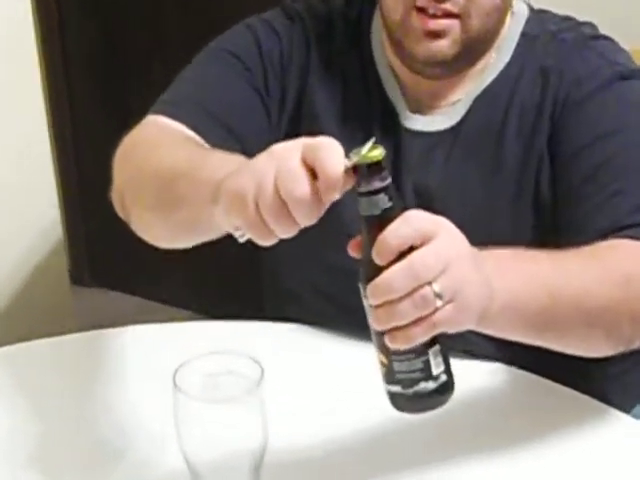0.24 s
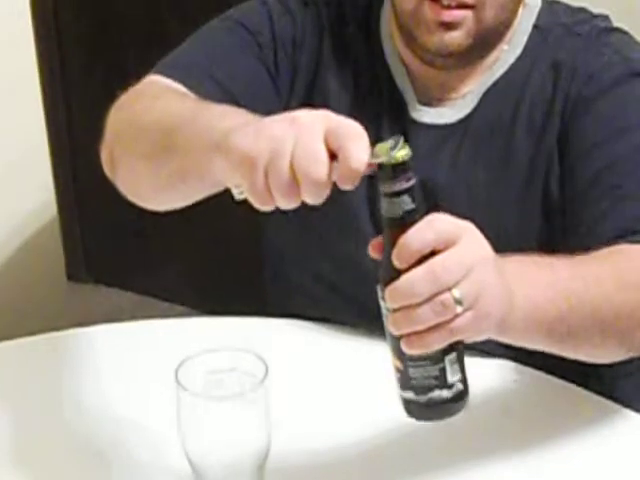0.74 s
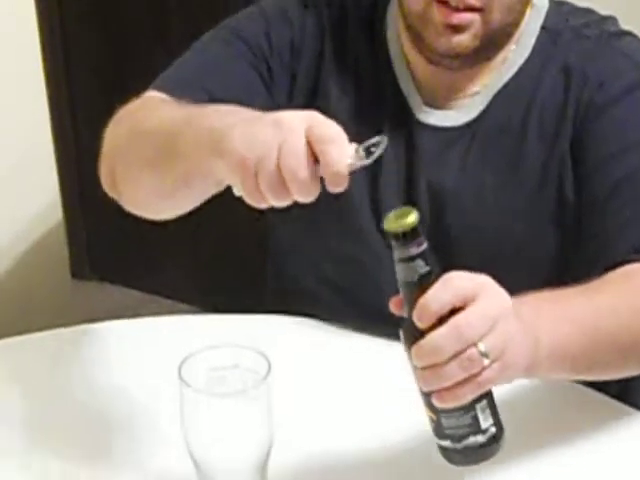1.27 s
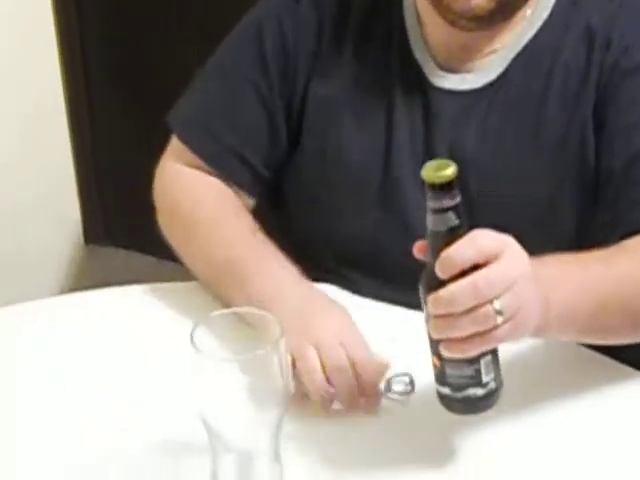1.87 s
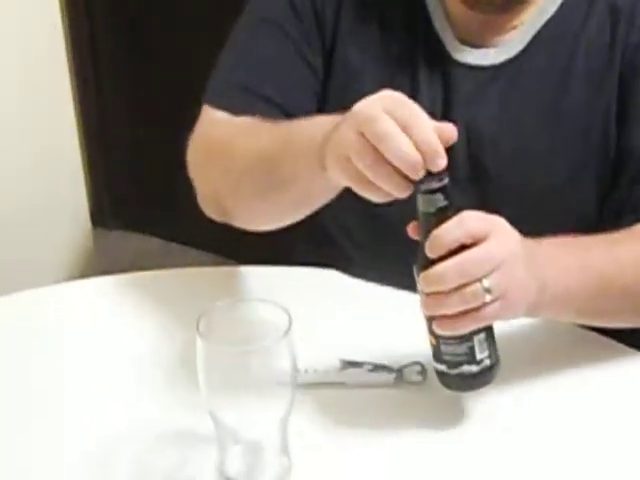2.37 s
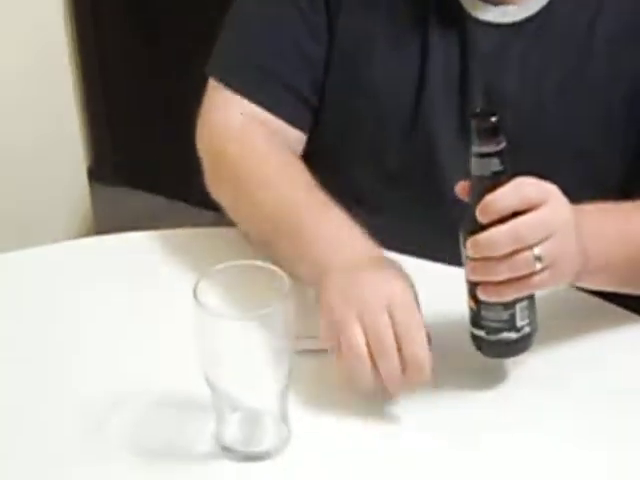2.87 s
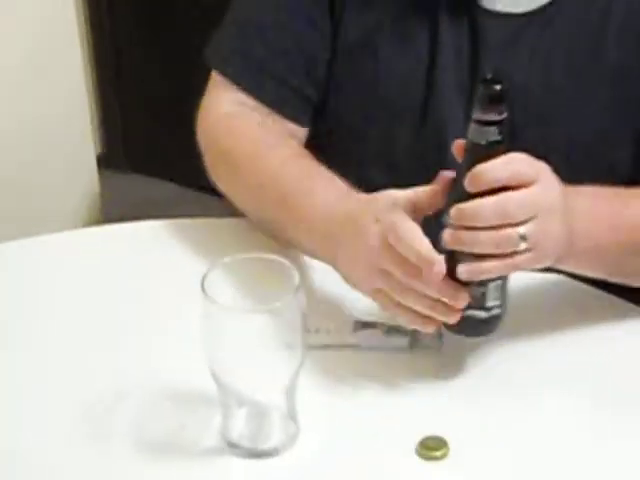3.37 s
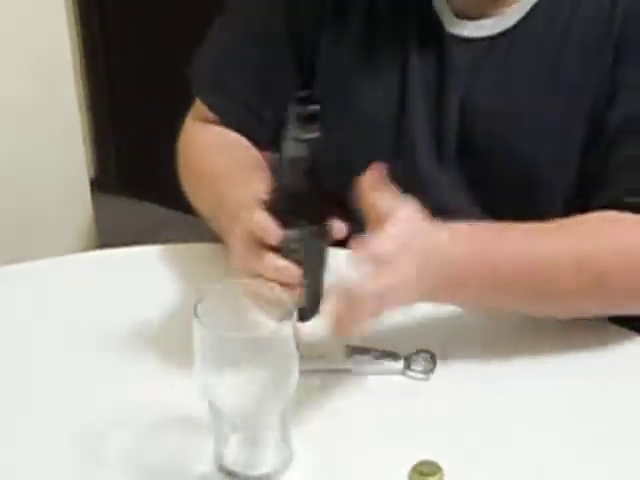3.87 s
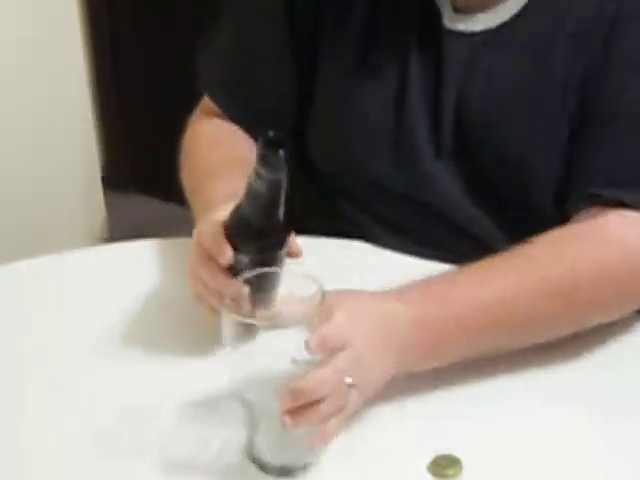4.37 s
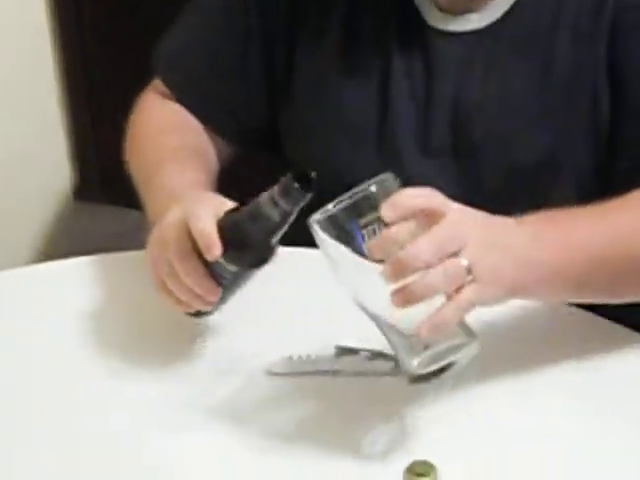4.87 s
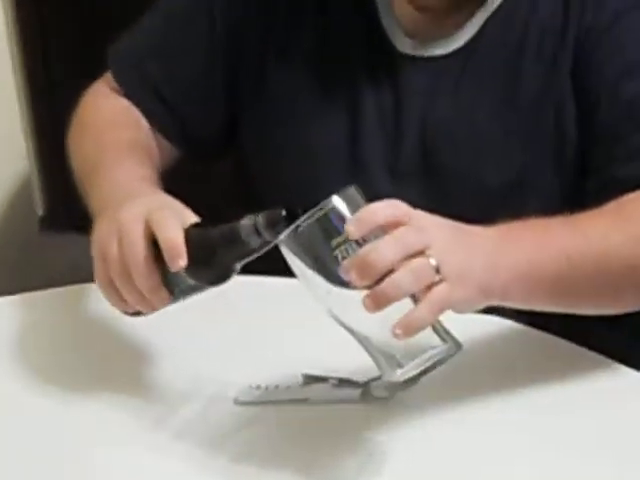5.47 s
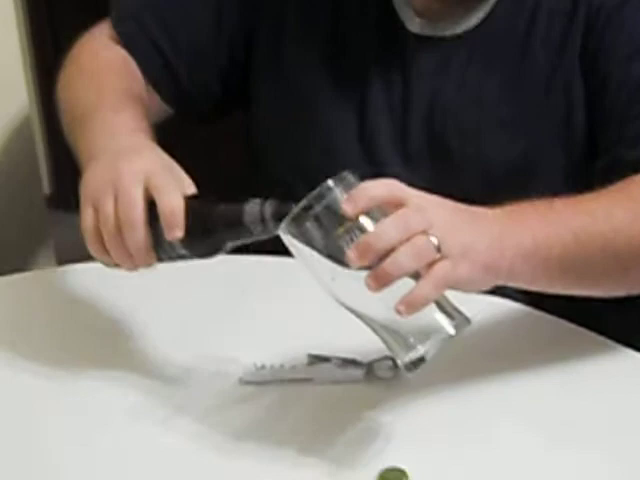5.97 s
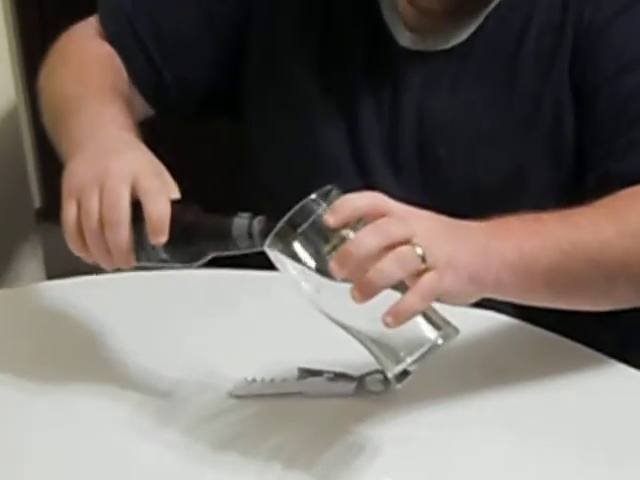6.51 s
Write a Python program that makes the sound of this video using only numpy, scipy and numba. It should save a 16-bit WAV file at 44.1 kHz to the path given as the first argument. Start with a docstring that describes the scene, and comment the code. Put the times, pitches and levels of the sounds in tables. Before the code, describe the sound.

In a small, slightly echoing room with an appliance humming, a beer bottle is opened close to the microphone: a thin hiss, a stronger spurt, then snapping metal and a pop from the neck. A metal opener is put down with a loud clatter and the loose cap lands ringing on the table. A glass judders quietly across the tabletop and is lightly knocked before a very soft, bubbling pour starts.

```python
"""Opening and pouring a beer.

Gas hisses under a crown cap, the cap twangs loose and the bottle neck pops and hoots. The opener is
laid on the table; the cap drops and bounces. A glass is dragged, tilted and knocked, and beer bubbles
down its wall. The small room echoes and an appliance hums. Gain control ducks at loud blows, holds,
then lets the room noise swell back."""
import sys
import numpy as np
from scipy import signal
from scipy.fft import rfft, irfft
from scipy.io import wavfile
from scipy.ndimage import minimum_filter1d
from numba import njit

SR = 44100
rng = np.random.default_rng(int(sys.argv[2]) if len(sys.argv) > 2 else 0)


def to_wav(sig):
    """Store sig (one row per channel, or 1-D mono) as 16-bit WAV at the path in sys.argv[1].

    Samples outside -1..1 are clipped; the rate is SR.
    """
    pcm = np.clip(np.atleast_2d(sig), -1, 1) * 32767
    pcm = np.round(pcm).astype(np.int16)
    wavfile.write(sys.argv[1], SR, pcm.T)  # frames by channels


N = 297366

# Gas spurts under the cap (start [s], widest [s], end [s], level [dB], closing time [s])
GAS_SPURTS = [(.008, .26, .35, -17, .25), (.044, 0.048, 0.054, -18, .12), (.409, .44, 0.47, -8.5, .07)]
# Gas jet spectrum (frequency [Hz], relative density [dB])
JET_SPECTRUM = [(300, -37.5), (1000, -19.5), (1700, -15.5), (2700, -19.5), (4500, -9.5), (7000, -5),
                (10000, 0.5), (12500, -1.5)]
# Resonances of the gap under the cap (frequency [Hz], width [Hz], lift [dB])
GAP_RESONANCES = [(5000, 400, 3), (5900, 350, 2.7), (6500, 280, 5.4), (7360, 370, 9.6), (8200, 350, 5),
                  (9000, 430, 3.7)]
# Neck air tones (start [s], widest [s], end [s], level [dB], first pitch [Hz], last pitch [Hz])
NECK_HOOTS = [(0.727, 0.735, .748, -7.5, 741, 898), (0.781, 0.774, .81, -18, 1010, 858),
              (0.998, 1.006, 1.025, -30, 876, 785)]
# Cap giving way in jerks
# (time [s], cap peak [dB], neck peak [dB], contact cutoff [Hz], cap ring/crack [dB], rattle gap [s])
CAP_PRY_JERKS = [(.0495, -25, -39.5, 9000, -19, .002), (0.7235, -19, -6.5, 7000, -13.5, .0036),
                 (.733, 5.5, 1, 6500, -23, .0013), (.778, -3.5, -16, 12000, -8, .0015),
                 (.7925, -1, -20, 3200, 26, .003), (.8012, 1.5, -2.5, 12000, 4, .003),
                 (.996, -18.5, -20.5, 8000, 6, .023), (2.3135, -32, -25, 4000, 6, .002)]
# First gush of beer, then a thin stream (start [s], widest [s], end [s], level [dB], closing time [s])
BEER_FLOWS = [(5.874, 5.905, 5.914, -36.5, 0.036), (5.85, 5.9, 6.74, -60, .3)]

# Blows (time [s], peak [dB], contact cutoff [Hz], ring/crack [dB], rattle gap [s])
OPENER_HITS = [(1.2445, -13.5, 3000, -5.5, .006), (1.3465, -25.5, 9000, -3, 0.0021),
               (1.398, -24, 5970, -5, .012), (1.5765, -22, 9740, -9.5, .003),
               (1.6365, -2.5, 5000, -7.5, 0.0097), (1.708, -8, 5000, -8, 0.0031),
               (1.7172, 4, 10000, 2, 0.0042), (1.847, 16.5, 8670, -13, .006),
               (1.8765, 4, 7000, -25, 0.0019), (2.0745, -22.5, 2000, -20, 0.0019)]  # lifted off, shifted in the hand, laid down
CAP_LANDINGS = [(3.0855, 15.7, 4930, 16, .0101), (3.137, 4.6, 11260, 6.1, .0158)]  # cap lands, hops, lands again
GLASS_JUDDERS = [(4.2312, -14, 1400, -4, 0.0092), (4.293, -24, 1700, -11, 0.0081),
                 (4.3085, -22.5, 557, 8, .009), (4.389, -27, 2820, -26, .005)]  # glass slipping over the table
GLASS_HITS = [(5.256, -8, 8500, 4.4, .007), (5.294, -20, 5000, 6, .005), (5.344, -25, 4470, 6, .004)]  # tilted glass chattering
BEER_SLAPS = [(5.832, -21.5, 3000, -6, .014), (5.9098, -16, 4050, -6.5, .003),
              (6.405, -29.5, 1500, -6, .008), (6.516, -29.5, 2000, -9, 0.0072)]  # beer hitting the glass wall

# Modes (frequency [Hz], relative level [dB], T60 [s])
NECK_MODES = [(2470, -10, .03), (3040, -6, .045), (3170, -2, .02), (3300, 0, .018), (3440, -2, .02),
              (3620, -5, .02)]  # bottle neck
HELD_CAP_MODES = [(3150, -16.5, 0.18), (5105, -1.5, 0.085), (5000, -11, .06), (8000, -9, 0.037),
                  (8100, -8, 0.06), (8340, 0.5, 0.071), (8930, -1, 0.097), (9200, -2.5, .04)]  # cap on the bottle
FREE_CAP_MODES = [(3660, -32.5, .07), (4020, -25.5, 0.1), (4564, -16, 0.12), (4600, -30, 0.11),
                  (4963, -2.5, 0.081), (8140, -14, 0.061), (8650, -2.5, 0.032), (8780, -13, 0.086),
                  (10300, -21, 0.091), (12030, -19, 0.069)]  # loose cap
OPENER_MODES = [(1420, -28.5, .02), (3174, -0.5, 0.0085), (4340, 2.5, 0.007), (5060, 1, 0.011),
                (7040, -4.5, 0.011), (9000, -7.5, .012), (9420, -4, 0.013)]  # bottle opener
TABLE_MODES = [(236, -13.5, .06), (392, -1.5, 0.048), (643, -2.5, 0.067), (900, -2, 0.029),
               (1500, -15, 0.051)]  # table top
GLASS_MODES = [(554, -6, 0.1), (1255, -5.5, 0.09), (1350, -1, 0.14), (1473, 0, 0.051), (1790, -5.5, 0.066),
               (2110, -19, 0.069), (2660, -7, 0.059), (2954, -3.5, 0.093), (3280, 5, 0.04),
               (3444, -2.5, 0.062), (4260, -3, 0.06), (4580, -5, .12), (5104, -4, 0.064), (6850, -6, 0.043),
               (7100, 6, 0.045), (8000, -12, 0.14), (9400, -8, .05)]  # hand-held glass
POCKET_MODES = [(950, -4.5, 0.016), (1145, 2, 0.029), (2680, 5, 0.0074)]  # air pocket in the beer

# Contact crack spectra (frequency [Hz], relative density [dB])
PRY_SPECTRUM = [(100, -33.5), (700, -10), (2000, -10), (3500, -3.5), (6300, 3), (9000, 9), (12000, -12.5)]  # metal cap being pried
OPENER_SPECTRUM = [(60, -35), (180, -10), (400, -3.5), (800, -7.5), (1500, 0), (2400, -7), (3300, -1.5),
                   (6000, 1.5), (12000, -0.5)]  # opener on the table
LANDING_SPECTRUM = [(150, -32), (700, -21), (1300, -4), (2200, -17), (3300, -1), (4500, 7), (6000, 3),
                    (12000, -14)]  # cap on the table
DULL_SPECTRUM = [(60, -18), (200, -3), (700, 0), (1500, -2.5), (2300, -12.5), (4000, -5.5), (11000, -5.5)]  # glass slips, beer slaps
KNOCK_SPECTRUM = [(100, -34), (550, 3), (900, -4.5), (1500, 3), (2400, -4), (3300, -4), (5000, -5),
                  (6000, -12), (7200, -15), (11000, -8)]  # knocked glass

# Room noise spectrum (frequency [Hz], relative density [dB])
ROOM_SPECTRUM = [(12, -4), (28, -2), (58, -6.5), (90, -12), (200, -10), (330, -6), (480, -10), (700, -14.5),
                 (1100, -14.5), (2000, -19.5), (4000, -21.5), (10000, -25), (11200, -28.5), (12500, -25.5)]
# Appliance hum tones (frequency [Hz], level [dB], width [Hz])
HUM_TONES = [(129.5, -56, 8), (236.1, -47.5, 2.7), (316.5, -54, 7.4), (360.7, -47, 2.8)]


def gas_hiss(sputter_db=0.87, sputter_hz=130):
    """Gas jets through the cap's crimp; foam in the gap makes it sputter."""
    sputter = flicker(sputter_db, sputter_hz)
    return spurts(GAS_SPURTS) * sputter * noise(JET_SPECTRUM, peaks=GAP_RESONANCES)


def neck_hoot(closing_s=.07, flutter_db=2, flutter_hz=120):
    """Neck air bounces on the gas below, as in a blown bottle; each hoot's pitch glides from its first to its
    last value."""
    out, t = 0, np.arange(N) / SR
    for start_s, widest_s, end_s, db, first_hz, last_hz in NECK_HOOTS:
        pitch_hz = np.interp(t, [start_s, end_s], [first_hz, last_hz])
        phase = 2 * np.pi * np.cumsum(pitch_hz) / SR
        out += spurts([(start_s, widest_s, end_s, db, closing_s)]) * np.sin(phase)
    return out * flicker(flutter_db, flutter_hz)


def neck_pops(contact_hz=5500, ring_db=7):
    """Each jerk of the cap pops the gas in the neck."""
    pops = [(time_s, db, contact_hz, ring_db, gap_s) for time_s, _, db, _, _, gap_s in CAP_PRY_JERKS]
    return blows(rattle(pops, count=3, loss_db=1.5), NECK_MODES, PRY_SPECTRUM, crack_t60_s=0.021)


def cap_twangs():
    """The bending cap rings at each jerk."""
    twangs = [(time_s, db, *contact) for time_s, db, _, *contact in CAP_PRY_JERKS]
    touches = rattle(twangs, count=3, loss_db=1.8)
    return blows(touches, HELD_CAP_MODES, PRY_SPECTRUM, crack_t60_s=0.056)


def opener_clatter():
    """The opener clicks in the hand and clatters onto the table."""
    touches = rattle(OPENER_HITS, count=3, loss_db=3.5, gap_ratio=1.15)
    return blows(touches, OPENER_MODES, OPENER_SPECTRUM, crack_t60_s=0.023)


def cap_drop():
    """The loose cap rings on the table, each landing a quickening rattle."""
    touches = rattle(CAP_LANDINGS, count=4, loss_db=1.3)
    return blows(touches, FREE_CAP_MODES, LANDING_SPECTRUM, crack_t60_s=0.059)


def glass_drag():
    """The sliding glass judders and shakes the table top."""
    touches = rattle(GLASS_JUDDERS, count=5, loss_db=0.5, gap_ratio=1.1)
    return blows(touches, TABLE_MODES, DULL_SPECTRUM, crack_t60_s=0.063)


def glass_knocks():
    """Knocks ring the glass itself, damped by the hand."""
    touches = rattle(GLASS_HITS, count=4, loss_db=0.25, gap_ratio=1.03)
    return blows(touches, GLASS_MODES, KNOCK_SPECTRUM, crack_t60_s=0.091)


def beer_bubbles(rate_per_s=1500, q=7, low_hz=700, high_hz=3800, spread_db=4, pitches=18):
    """Small bubbles ring at random as the stream runs down the wall."""
    strengths = from_db(spread_db * rng.standard_normal(N))
    kicks = strengths * (rng.random(N) < rate_per_s / SR)
    pitch_index = rng.integers(0, pitches, N)
    bubbles = sum(resonate(kicks * (pitch_index == k), hz, hz / q) * np.sqrt(hz)
                  for k, hz in enumerate(np.geomspace(low_hz, high_hz, pitches)))
    return spurts(BEER_FLOWS) * rms_one(bubbles)


def beer_slaps():
    """The first beer slaps the wall and rings an air pocket."""
    touches = rattle(BEER_SLAPS, count=2, loss_db=4)
    return blows(touches, POCKET_MODES, DULL_SPECTRUM, crack_t60_s=0.026)


def room(x, echo_db=-11, t60_s=0.26, first_echo_s=.005, wall_cutoff_hz=9000):
    """Direct sound plus dense, fast-dying wall echoes."""
    t = np.arange(SR // 2) / SR
    echoes = rng.standard_normal(len(t)) * decay(t, t60_s) * (t > first_echo_s)
    echoes = low_pass(echoes, wall_cutoff_hz, order=1)
    return x + from_db(echo_db) * signal.fftconvolve(x, echoes / np.linalg.norm(echoes))[:N]


def background(noise_db=-39, waver=0.63):
    """Steady room noise and an appliance's wavering hum."""
    out, t = from_db(noise_db) * noise(ROOM_SPECTRUM), np.arange(N) / SR
    for hz, db, width_hz in HUM_TONES:
        tone = np.sqrt(2) * np.sin(2 * np.pi * (hz * t + rng.random()))
        narrow_noise = rms_one(resonate(rng.standard_normal(N + SR), hz, width_hz)[SR:])
        out += from_db(db) * rms_one(tone + waver * narrow_noise)
    return out


def rattle(rows, count, loss_db, gap_ratio=.86):
    """Split each blow into touches: gaps scale geometrically, strength falls ever faster."""
    return [(time_s + gap_s * np.sum(gap_ratio ** np.arange(k)), db - loss_db * k ** 2, cutoff, ring_db)
            for time_s, db, cutoff, ring_db, gap_s in rows for k in range(count)]


def blows(touches, modes, crack_spectrum, crack_t60_s):
    """Each touch is a noise crack plus randomly weighted modes; soft contacts are duller."""
    size = SR // 3
    t, out = np.arange(size) / SR, np.zeros(N + size)
    hz, mode_db, t60_s = np.transpose(modes)
    rings = np.sin(2 * np.pi * hz[:, None] * t) * decay(t, t60_s[:, None])
    for time_s, peak_db, contact_hz, ring_db in touches:
        weights = from_db(mode_db + rng.uniform(-2.4, 2, len(hz))) * rng.choice([-1, 1], len(hz))
        ring = from_db(ring_db) * peak_one(weights @ rings)
        crack = peak_one(noise(crack_spectrum, size) * decay(t, crack_t60_s))
        start = round(time_s * SR)
        out[start:start + size] += from_db(peak_db) * peak_one(low_pass(crack + ring, contact_hz))
    return out[:N]


def spurts(rows, onset_s=.012, swell_db=9.5, sag_db=4, silent_db=-100):
    """Envelope of flows that set in, swell, sag and close."""
    gain, t = 0, np.arange(N) / SR
    for start_s, widest_s, end_s, db, closing_s in rows:
        times_s = [start_s - onset_s, start_s, widest_s, end_s, end_s + closing_s]
        levels_db = [silent_db, db - swell_db, db, db - sag_db, silent_db]
        gain += from_db(np.interp(t, times_s, levels_db))
    return gain


def flicker(depth_db, cutoff_hz):
    """Gain wandering randomly about 1."""
    return from_db(depth_db * rms_one(low_pass(rng.standard_normal(N), cutoff_hz)))


def noise(spectrum, size=N, peaks=()):
    """Unit-RMS shaped noise with bell-shaped resonances."""
    hz = np.maximum(np.fft.rfftfreq(size, 1 / SR), 1)
    points_hz, points_db = np.transpose(spectrum)
    db = np.interp(np.log(hz), np.log(points_hz), points_db)
    for centre_hz, width_hz, lift_db in peaks:
        db += lift_db / (1 + (2 * (hz - centre_hz) / width_hz) ** 2)
    return rms_one(irfft(rfft(rng.standard_normal(size)) * from_db(db), size))


def resonate(x, hz, width_hz):
    """Two-pole band-pass resonator."""
    radius = np.exp(-np.pi * width_hz / SR)
    feedback = [1, -2 * radius * np.cos(2 * np.pi * hz / SR), radius ** 2]
    return signal.lfilter([1, 0, -1], feedback, x + 1e-18)


def low_pass(x, hz, order=2):
    return signal.sosfilt(signal.butter(order, hz, fs=SR, output="sos"), x)


def decay(t, t60_s):
    return np.exp(-np.log(1000) * t / t60_s)


def from_db(db):
    return 10 ** (np.asarray(db) / 20)


def rms_one(x):
    return x / np.sqrt(np.mean(x ** 2) + 1e-20)


def peak_one(x):
    return x / np.max(np.abs(x))


@njit
def ride_gain(allowed, gain, attack_samples, hold_samples, release_samples):
    """Gain falls fast to the allowed value, holds, then creeps back to 1."""
    out, waited = np.empty(len(allowed)), 0
    for i in range(len(allowed)):
        waited += 1
        if allowed[i] < gain:
            gain *= (allowed[i] / gain) ** (1 / attack_samples)
            waited = 0
        elif waited > hold_samples:
            gain += (1 - gain) / release_samples
        out[i] = gain
    return out


def gain_control(x, ceiling_db=-2.0, start_db=-3, attack_s=0.0009, hold_s=0.71, release_s=0.78):
    """Peaks over the ceiling, seen about 3 ms ahead, turn everything down."""
    peaks = -minimum_filter1d(-np.abs(x), size=240)
    allowed = from_db(ceiling_db) / (peaks + 1e-9)
    return x * ride_gain(allowed, float(from_db(start_db)), attack_s * SR, hold_s * SR, release_s * SR)


def scene():
    """Bottle, glass and beer in the room; mono."""
    bottle = gas_hiss() + neck_hoot() + neck_pops() + cap_twangs()
    clatter = opener_clatter() + cap_drop()
    glass = glass_drag() + glass_knocks()
    beer = beer_bubbles() + beer_slaps()
    return (room(bottle + clatter + glass + beer) + background())[None]


def record(dry, mic_band_hz=12150, stop_hz=11050, stop_db=15.5, clip_level=.78, cutoff_hz=16500):
    """Microphone band limit, gain control, dulled top, overload on the hardest peaks, final low-pass."""
    levelled = gain_control(low_pass(dry[0], mic_band_hz, order=20))
    dulled = signal.sosfilt(signal.cheby2(6, stop_db, stop_hz, fs=SR, output="sos"), levelled)
    oversampled = signal.resample_poly(dulled, 4, 1)
    clipped = signal.resample_poly(np.clip(oversampled, -clip_level, clip_level), 1, 4)
    return low_pass(clipped, cutoff_hz, order=16)[None]


dry = scene()
out = record(dry)
to_wav(out)
```